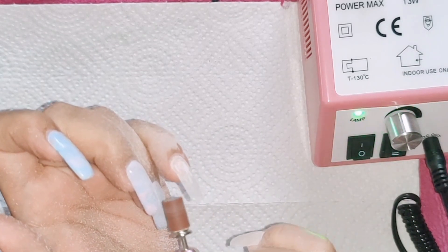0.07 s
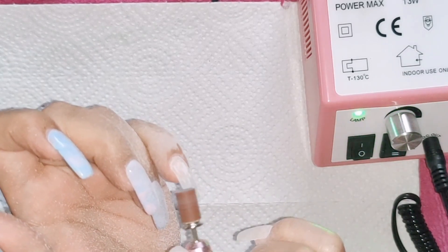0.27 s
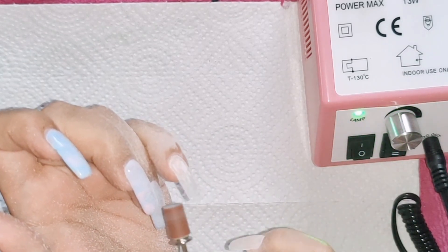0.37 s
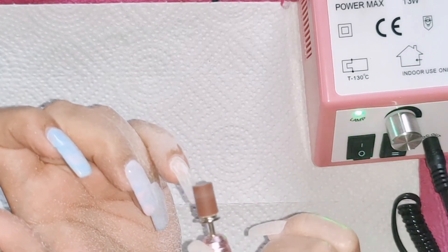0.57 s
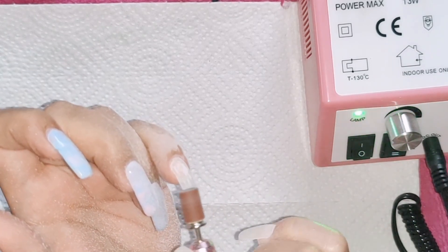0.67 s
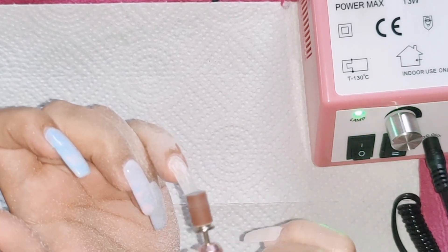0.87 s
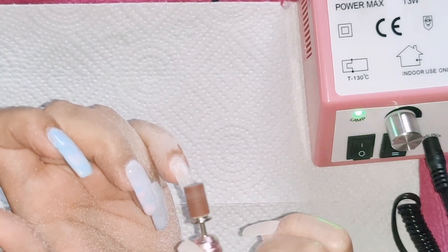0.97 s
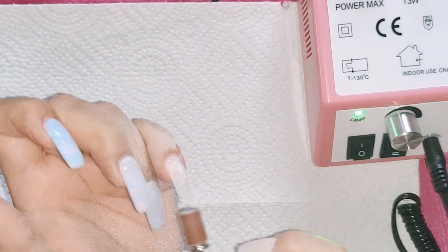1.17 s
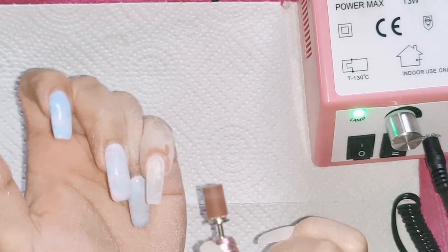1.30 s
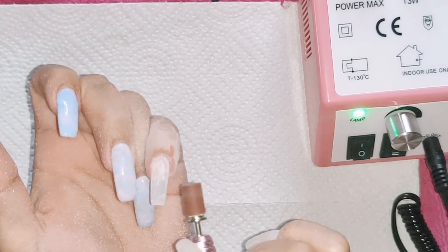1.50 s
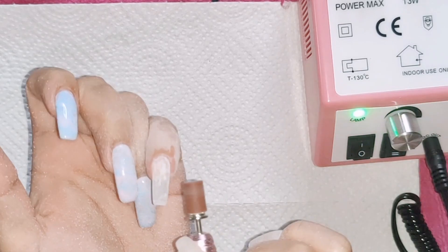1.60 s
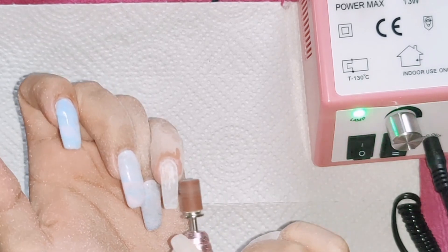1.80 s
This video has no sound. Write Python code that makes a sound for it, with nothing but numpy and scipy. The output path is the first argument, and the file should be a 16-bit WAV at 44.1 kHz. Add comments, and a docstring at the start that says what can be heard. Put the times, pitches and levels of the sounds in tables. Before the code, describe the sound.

A small electric nail drill runs close to the microphone in a quiet room. Its sanding band rasps against a fingernail three times in quick succession, then the motor idles with a soft hum and thin whine.

```python
"""Electric nail drill on a fingernail

A small drill idles up close: shaft hum, a whirring bearing, brushes that fizz and make the handpiece whine.
Its sanding band is pressed to a nail three times. The band's high spot ticks once a turn, the grit rasps,
the nail rings and the motor sags under the load. A small, quiet room answers the strokes."""
import sys
import numpy as np
from scipy import signal
from scipy.fft import rfft, irfft
from scipy.io import wavfile
from scipy.ndimage import uniform_filter1d, map_coordinates

SR = 44100
rng = np.random.default_rng(int(sys.argv[2]) if len(sys.argv) > 2 else 0)


def waveform_to_disk(signal):
    """Save audio, clipped to [-1, 1], as 16-bit WAV at the path in sys.argv[1]."""
    frames = np.transpose(np.atleast_2d(signal))
    scaled = np.clip(frames, -1, 1) * 32767
    samples = np.round(scaled).astype(np.int16)
    wavfile.write(sys.argv[1], SR, samples)


N = 81585

IDLE_HZ = 215.42  # unloaded shaft speed
# Strokes on the nail: start_s, firmest_s, end_s, rasp_db, nail_db, sag_hz, nail_ring_hz
STROKES = [(.1105, 0.168, .203, -30.6, -32.3, 14.5, 3220), (.5106, 0.53, .627, -34.2, -40.3, 2.8, 3120),
           (.8311, 0.907, .942, -31.3, -32.8, 11, 2450)]


def sanding(t, turns):
    """A light touch catches mostly the band's high spot; a firm one drags the whole band."""
    spot_turns, spot_width_turns, rest_of_band_db = .12, .15, -3.5
    out = 0
    for start, firmest, end, rasp_db, nail_db, _, ring_hz in STROKES:
        contact, pressure = touch(t, start, firmest, end)
        past_spot = turns - np.interp(start, t, turns) - spot_turns
        spot = np.exp(-.5 * (np.sin(np.pi * past_spot) / (np.pi * spot_width_turns)) ** 2)
        grip = 1.152 * (spot + undb(rest_of_band_db) * pressure ** .5 * (1 - spot))
        rasp = grit_rasp(turns, grip * contact)
        nail = nail_body(turns, grip * pressure ** .75, ring_hz)
        tick = spot_tick(t, past_spot, pressure, start, end)
        out = out + undb(rasp_db) * (rasp + undb(10) * tick) + undb(nail_db) * nail
    return signal.sosfilt(signal.butter(2, 250, "high", fs=SR, output="sos"), out)


def grit_rasp(turns, grip):
    """Grit scrapes the nail, with a brief metallic ring from the mandrel."""
    # Tone of the grit: freq_hz, gain_db
    grit_eq = [(150, -24.5), (600, -19.5), (1200, -7), (3600, -18), (4400, -20), (5200, -12), (6100, -13),
               (6850, -1), (7800, -1), (8600, -0.5), (9050, -6), (9650, 0), (10500, 1.5), (11300, 4),
               (12300, 1.5), (13000, -3), (14500, -8), (15500, -15), (16000, -41)]
    friction = scrape(turns, fresh_db=-3.5, grain=.3)
    return unity_eq(metal_ring(friction, t60_s=.04, ring_db=-4.5) * grip, grit_eq)


def nail_body(turns, drive, ring_hz):
    """Friction drives the nail, which rings at a different pitch on each stroke."""
    # Resonances of the nail: freq_hz, gain_db
    nail_eq = [(60, -27), (150, -20.5), (500, -30.5), (720, -10.5), (850, -14.5), (1250, -9.5), (1500, -10),
               (1900, 3.5), (2200, -7), (2550, 2), (3150, 1.5), (3750, -2), (4150, -16.5), (4800, -12),
               (5200, -2), (5600, -18.5), (6100, -25), (7500, -50)]
    body = unity_eq(scrape(turns, fresh_db=-10, grain=.25) * drive, nail_eq)
    return (body + undb(1.5) * resonate(body, ring_hz, width_hz=1040)) / 1.78


def spot_tick(t, past_spot, pressure, start, end):
    """The high spot strikes once a turn: uneven bursts of noise that soften under pressure."""
    # Tone of the tick: freq_hz, gain_db
    tick_eq = [(300, -23), (1200, -13.5), (3200, -0.5), (4400, -15), (6000, -19), (7500, -10), (11000, -1),
               (14500, -2.5), (16000, -12.5)]
    fade_s, linger_s, decay_turns = .008, .005, .06
    gate = np.clip(np.minimum(t - start, end + linger_s - t) / fade_s, 0, 1) ** .5
    strike = np.exp(-(past_spot % 1) / decay_turns) * gate * undb(-6 * pressure + 1.5 * drift(240))
    return unity_eq(np.sign(rng.standard_normal(N)) * strike, tick_eq)


def touch(t, start, firmest, end):
    """Contact and pressure of one stroke, both 0-1: the hand lands, leans in and lifts."""
    attack_s, release_s, light_pressure = .009, .01608, .42
    contact = np.clip(np.minimum((t - start) / attack_s, (end - t) / release_s), 0, 1)
    return contact, contact * np.interp(t, [start, firmest, end], [light_pressure, 1, light_pressure])


def shaft_turns(t):
    """Running count of turns; the motor lags behind its load as each stroke slows it."""
    lag_s = .05
    load_hz = sum(sag_hz * touch(t, start, firmest, end)[1]
                  for start, firmest, end, _, _, sag_hz, _ in STROKES)
    pole = np.exp(-1 / (lag_s * SR))
    slowing_hz = signal.lfilter([1 - pole], [1, -pole], load_hz)
    return np.cumsum(IDLE_HZ - slowing_hz + .1205 * drift(9.05)) / SR


def shaft_hum(turns):
    """The spinning shaft hums at multiples of its speed."""
    # Shaft harmonics, from the fundamental up: relative_db
    harmonics = [-5, -15, -6, -29, -14, -2, -12, -23, 0, -22, -20, -25, -18, -30, -14, -18, -17, -30, -24,
                 -13, -35, -30, -19]
    hum = sum(undb(db) * np.sin(2 * np.pi * (k * turns + rng.random())) for k, db in enumerate(harmonics, 1))
    return level(hum, -63)


def bearing_whirr(turns):
    """The bearing sings wavering tones that follow the shaft, over a narrow band of noise."""
    # Bearing tones: idle_pitch_hz, relative_db
    partials = [(1082, -65.5), (1163, -75), (1297, -66)]
    tones = sum(undb(db + .83 * drift(4.93)) * np.sin(2 * np.pi * hz * turns / IDLE_HZ + .74 * drift(20))
                for hz, db in partials)
    whirr = narrow_band(rng.standard_normal(N), hz=1234, width_hz=130)
    return level(tones, -67.5) + level(whirr, -59)


def brushes(t, turns):
    """The brushes rub, swelling twice a turn; they fizz and excite the handpiece."""
    # Tone of the fizz: freq_hz, gain_db
    fizz_eq = [(1410, -37.5), (2400, -4), (2730, -13), (3140, -5), (3740, -15.5), (4220, -4), (4750, -39),
               (5140, -17), (6170, -24.5), (9630, -2.5), (11500, 0.5), (14000, -10), (16000, -20.5)]
    cage = surface(turns / 5, size=1000)  # roughness that repeats every five turns
    friction = scrape(turns, fresh_db=-1.5, grain=.52) + undb(-7) * cage
    friction *= undb(2 * np.cos(4 * np.pi * turns))
    fizz = eq(metal_ring(friction, t60_s=.1, ring_db=-12.5), fizz_eq)
    return level(fizz, -59.5) + handpiece_whine(t, friction)


def handpiece_whine(t, friction):
    """The metal handpiece resonates; its modes change balance as the hand draws it back and turns it."""
    # Handpiece modes: pitch_hz, width_hz, near_gain_db, away_gain_db
    modes = [(4270, 81, -12, -17), (9400, 800, -9, -4), (9800, 80, 4, -5), (10090, 63, -8, -6),
             (11100, 59, -3, -4), (11260, 54, -2, -3), (11410, 220, 2.5, -1.5), (13300, 630, -5.5, -4.5)]
    draw_back_s = (1.1, 1.53)
    whine = 0
    for hz, width_hz, near_db, away_db in modes:
        gain_db = np.interp(t, draw_back_s, [near_db, away_db]) + 1.8 * drift(4.985)
        whine = whine + level(narrow_band(friction, hz, width_hz), -70) * undb(gain_db)
    return whine


def room_reverb(x):
    """Diffuse tail of a small furnished room."""
    t60_s, predelay_s, wet_db = .23, .0068, -11.5
    t = np.arange(N) / SR
    tail = rng.standard_normal(N) * undb(-60 * t / t60_s) * np.clip(t / predelay_s - 1, 0, 1)
    tail = eq(tail / np.linalg.norm(tail), [(250, 14), (800, 1), (2500, .5), (7000, -3.5), (15000, -1.5)])
    return undb(wet_db) * signal.fftconvolve(x, tail)[:N]


def room_tone(t):
    """Steady air with a faint, wavering low hum."""
    # Tone of the room's air: freq_hz, gain_db
    air_eq = [(25, -48), (45, -12), (65, -15), (90, -9.5), (150, -5.5), (270, -1.5), (400, -3.5),
              (700, 1.5), (1000, 0), (1800, 0.5), (2600, -11.5), (5000, -20), (15000, -42)]
    air = eq(rng.standard_normal(N), air_eq)
    hum = undb(2.5 * drift(9.26)) * np.sin(2 * np.pi * 87.6 * t + 1.1 * drift(6.7))
    return level(air, -61) + level(hum, -84)


def scrape(turns, fresh_db, grain):
    """Friction: the repeating surface plus fresh, uneven grains."""
    noise, unevenness = rng.standard_normal((2, N))
    return level(surface(turns) + level(noise * np.exp(grain * unevenness), fresh_db), 0)


def surface(turns, size=200):
    """A rough loop of random bumps, felt again on every turn."""
    bumps = level(irfft(np.exp(2j * np.pi * rng.random(size // 2 + 1))), 0)
    return map_coordinates(bumps, [turns % 1 * size], mode="grid-wrap")


def metal_ring(x, t60_s, ring_db):
    """Blend in the dense, short ring of a small metal part."""
    t = np.arange(N) / SR
    tail = rng.standard_normal(N) * undb(-60 * t / t60_s)
    ringing = signal.fftconvolve(x, tail / np.linalg.norm(tail))[:N]
    return (x + undb(ring_db) * ringing) / np.hypot(1, undb(ring_db))


def resonate(x, hz, width_hz):
    """One resonance, gain 1 at its centre."""
    return signal.lfilter(*signal.iirpeak(hz, hz / width_hz, fs=SR), x)


def narrow_band(x, hz, width_hz):
    """A resonance with its skirts trimmed by a wider one."""
    return resonate(resonate(x, hz, width_hz), hz, 3 * width_hz)


def eq(x, points):
    """Minimum-phase EQ through (freq_hz, gain_db) points."""
    size = 2048
    hz, db = np.array(points, float).T
    bins_hz = np.maximum(np.arange(size // 2 + 1) * SR / size, 1)
    cepstrum = irfft(np.log(undb(np.interp(np.log(bins_hz), np.log(hz), db))))
    cepstrum[1:size // 2] *= 2
    cepstrum[size // 2 + 1:] = 0
    return signal.fftconvolve(x, irfft(np.exp(rfft(cepstrum))))[:N]


def unity_eq(x, points):
    """EQ that keeps the power of white noise."""
    return eq(x, points) / np.linalg.norm(eq(signal.unit_impulse(N), points))


def drift(rate_hz):
    """Smooth random modulation, rms 1."""
    hold = int(SR / rate_hz)
    steps = np.repeat(rng.standard_normal(N // hold + 1), hold)
    return level(uniform_filter1d(uniform_filter1d(steps, hold), hold)[:N], 0)


def level(x, db):
    """Scale to an rms level."""
    return x * undb(db) / np.sqrt(np.mean(x ** 2))


def undb(db):
    """Decibels to gain."""
    return 10 ** (np.asarray(db) / 20)


def scene():
    """Sanding and motor over room tone; only the sanding feeds the reverb."""
    t = np.arange(N) / SR
    turns = shaft_turns(t)
    strokes = sanding(t, turns)
    air = room_tone(t)
    motor = shaft_hum(turns) + bearing_whirr(turns) + brushes(t, turns)
    return (strokes + motor + room_reverb(strokes) + air)[None]


def record(dry):
    """A steep high cut at 15.8 kHz."""
    return signal.sosfilt(signal.ellip(8, .2, 70, 15800, fs=SR, output="sos"), dry)


dry = scene()
out = record(dry)
waveform_to_disk(out)
```